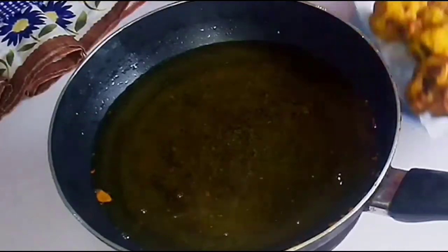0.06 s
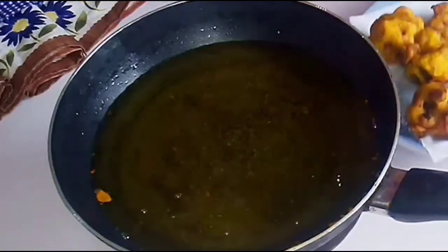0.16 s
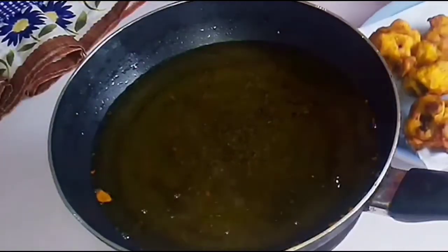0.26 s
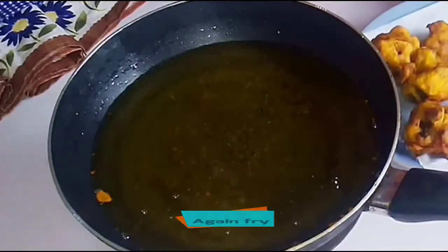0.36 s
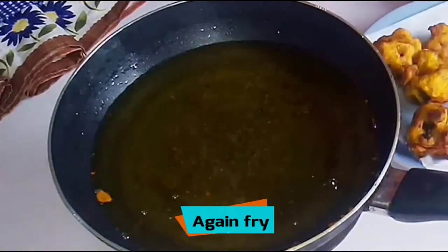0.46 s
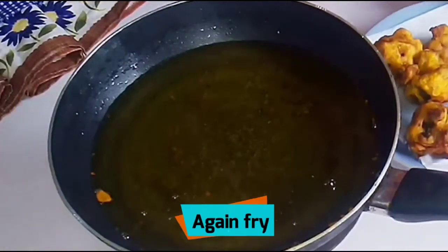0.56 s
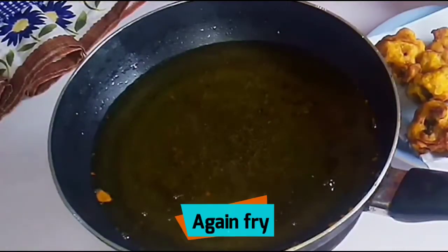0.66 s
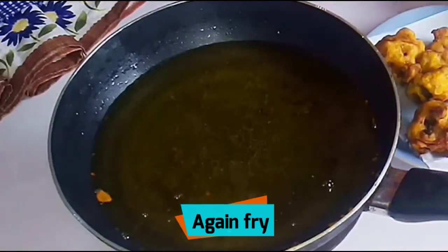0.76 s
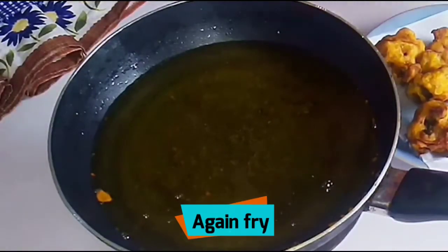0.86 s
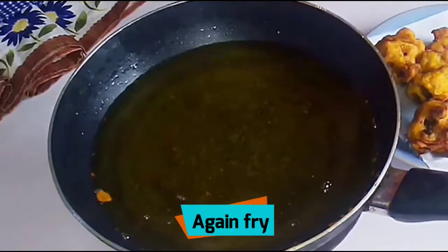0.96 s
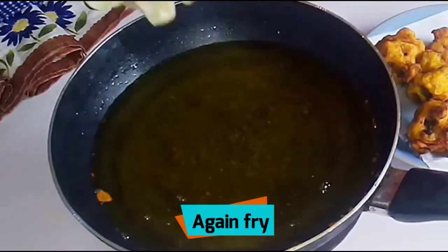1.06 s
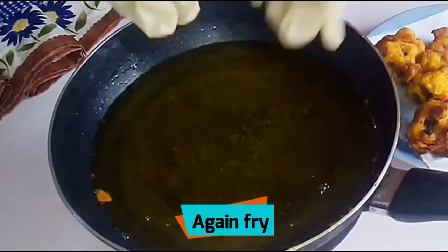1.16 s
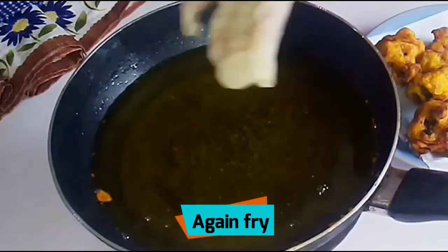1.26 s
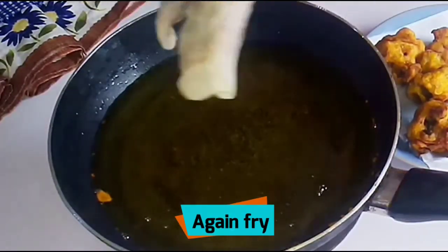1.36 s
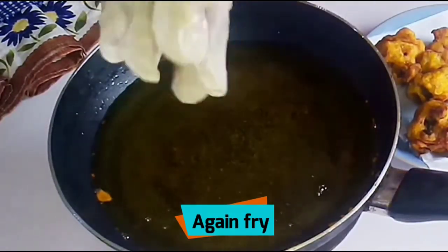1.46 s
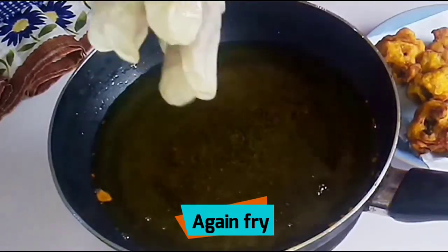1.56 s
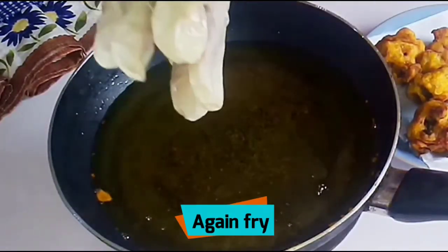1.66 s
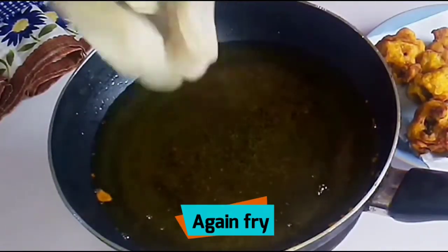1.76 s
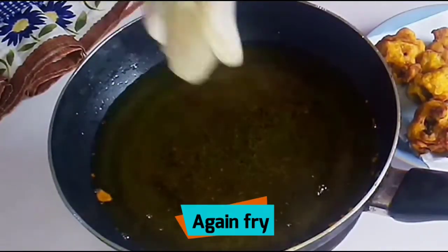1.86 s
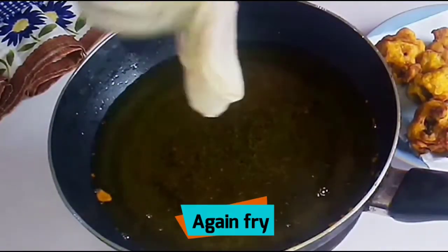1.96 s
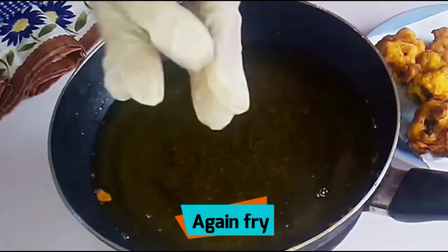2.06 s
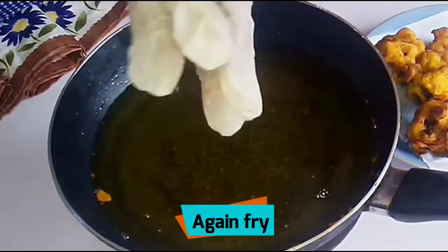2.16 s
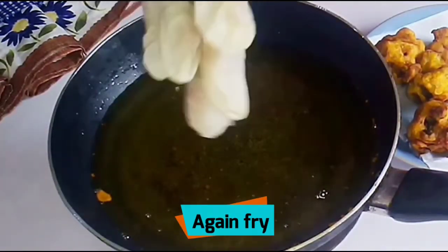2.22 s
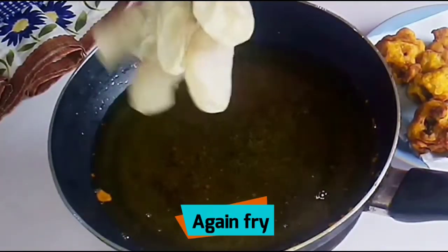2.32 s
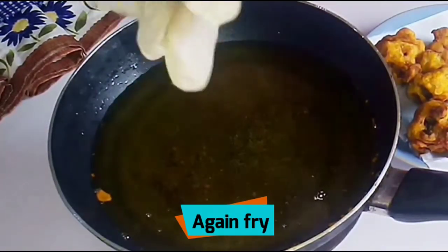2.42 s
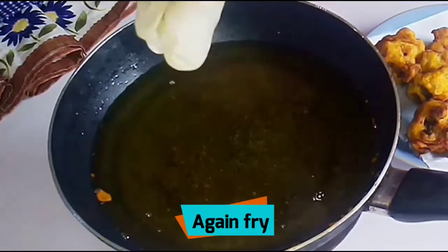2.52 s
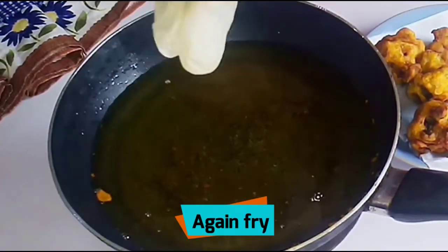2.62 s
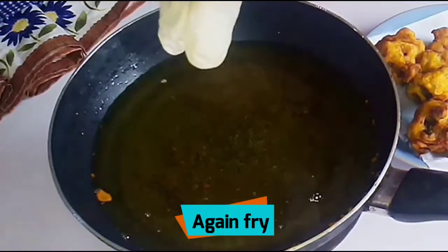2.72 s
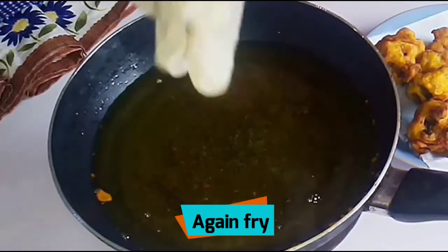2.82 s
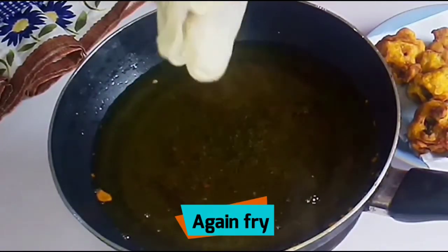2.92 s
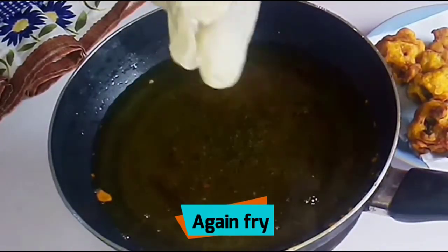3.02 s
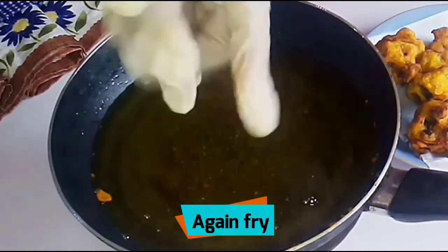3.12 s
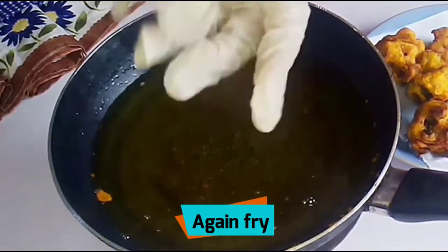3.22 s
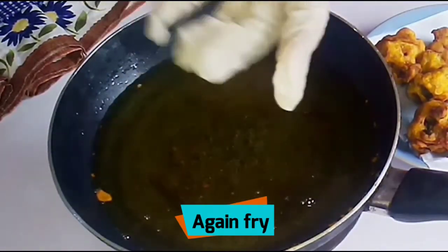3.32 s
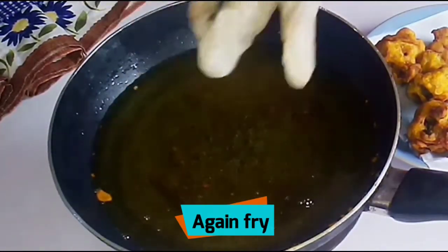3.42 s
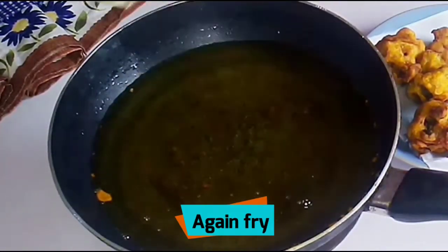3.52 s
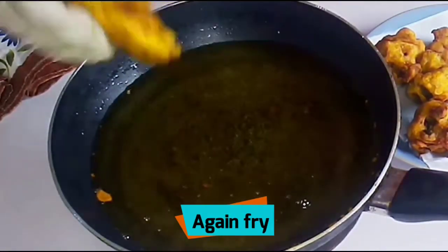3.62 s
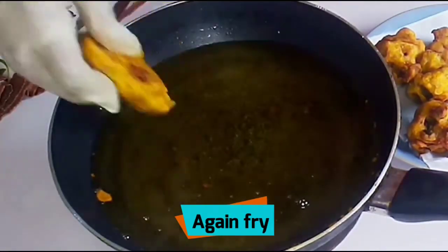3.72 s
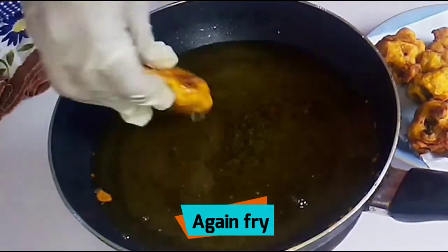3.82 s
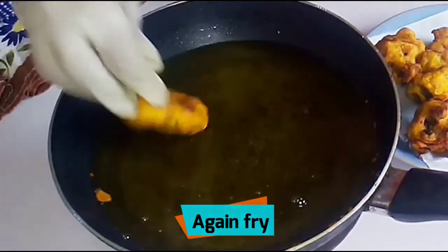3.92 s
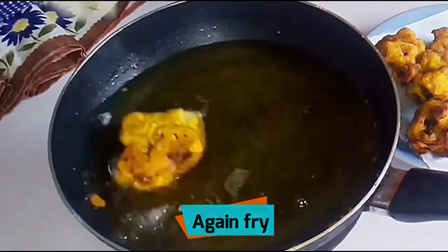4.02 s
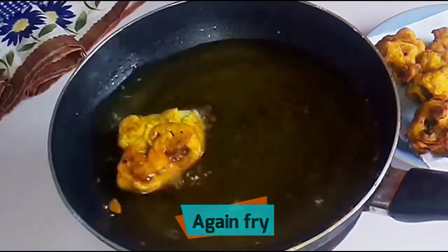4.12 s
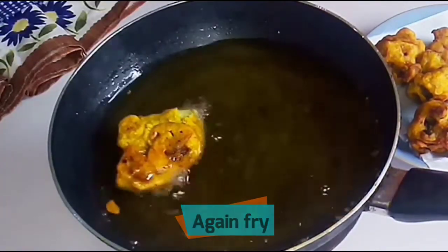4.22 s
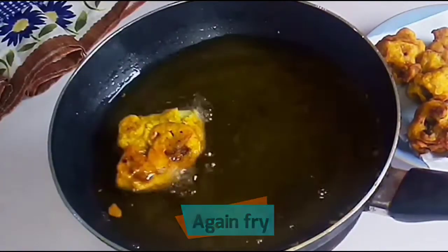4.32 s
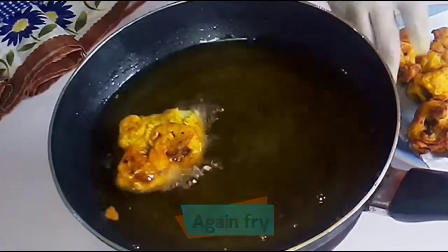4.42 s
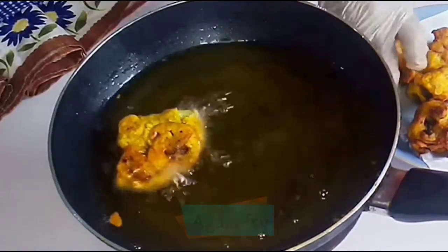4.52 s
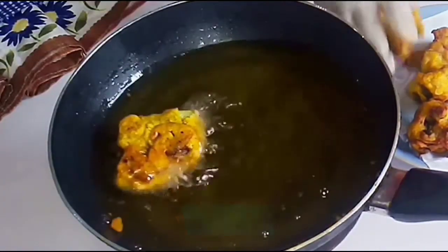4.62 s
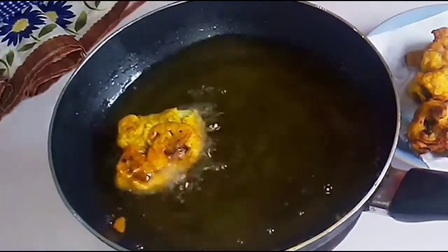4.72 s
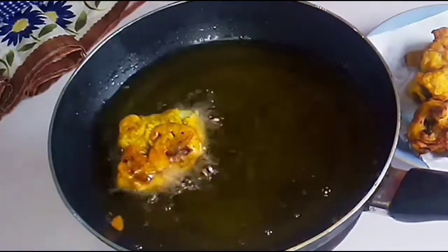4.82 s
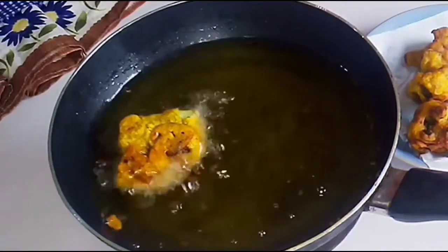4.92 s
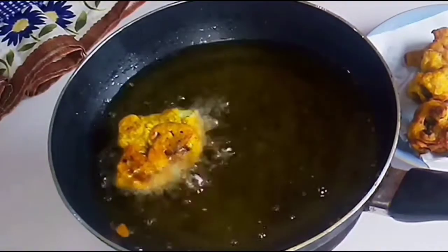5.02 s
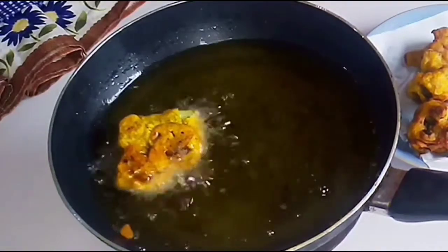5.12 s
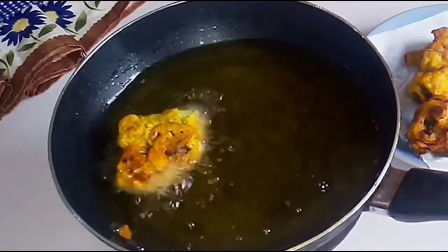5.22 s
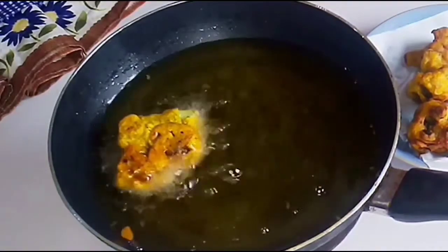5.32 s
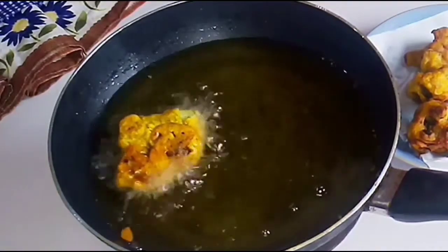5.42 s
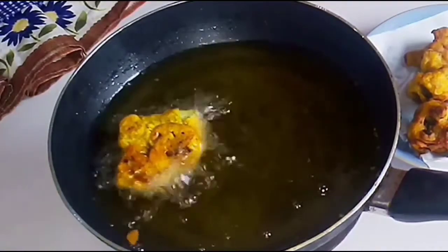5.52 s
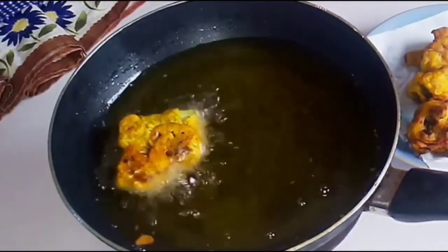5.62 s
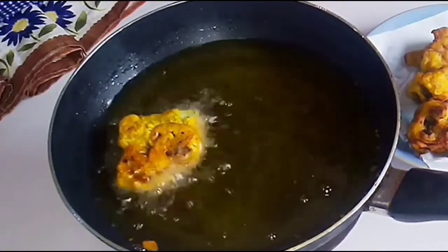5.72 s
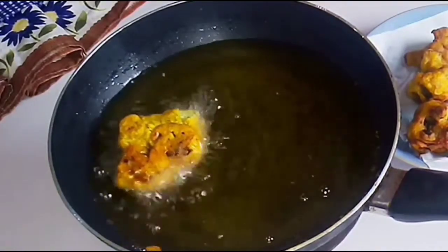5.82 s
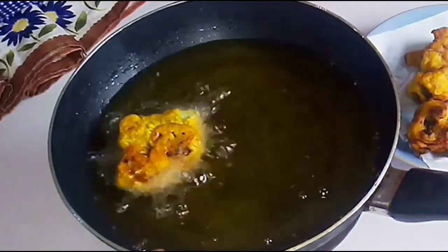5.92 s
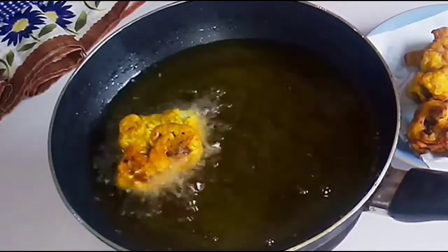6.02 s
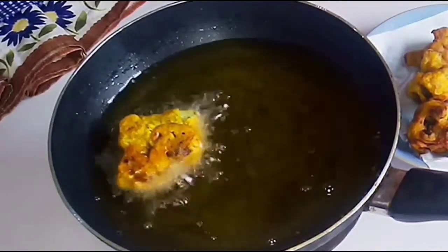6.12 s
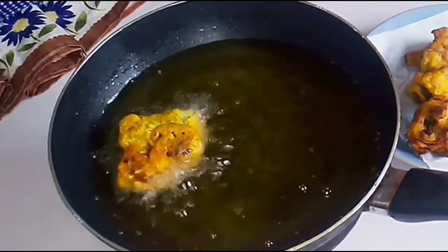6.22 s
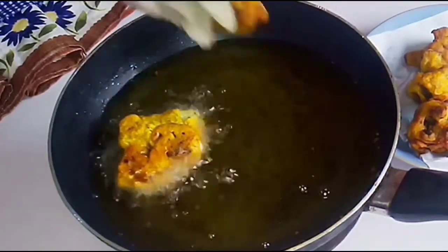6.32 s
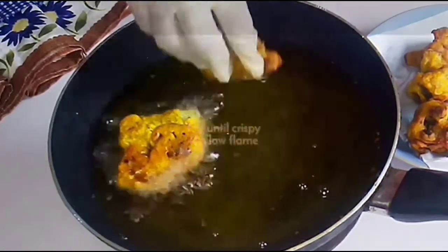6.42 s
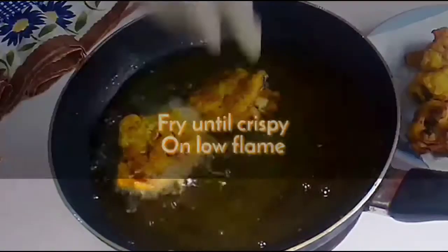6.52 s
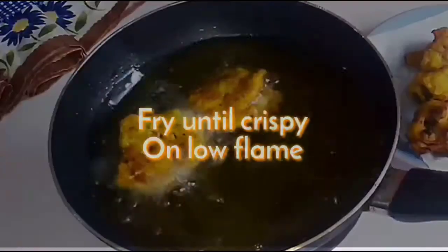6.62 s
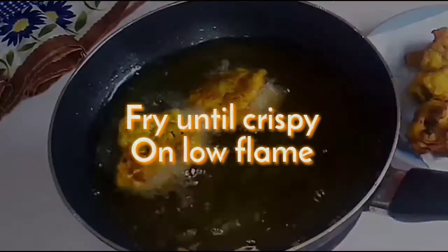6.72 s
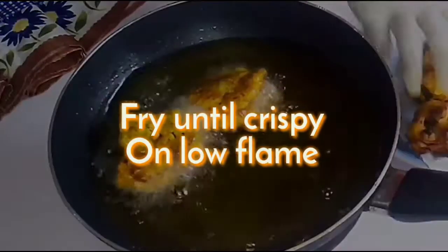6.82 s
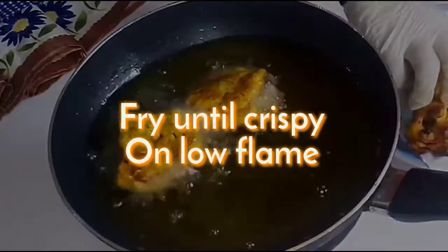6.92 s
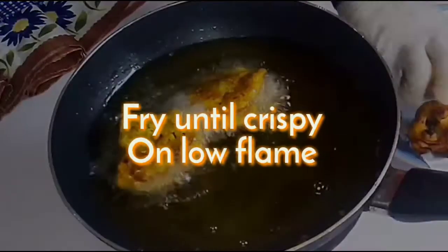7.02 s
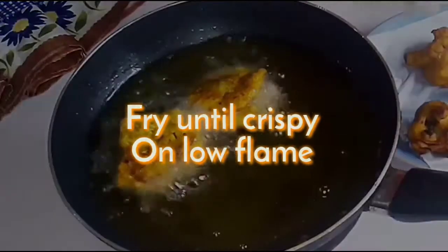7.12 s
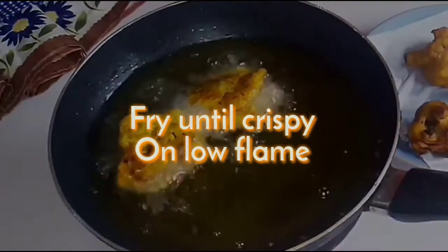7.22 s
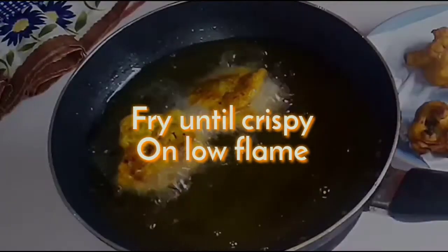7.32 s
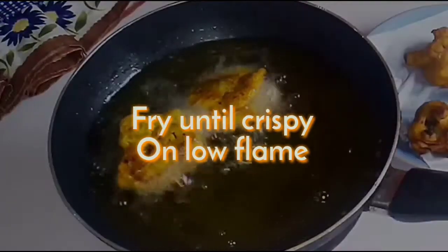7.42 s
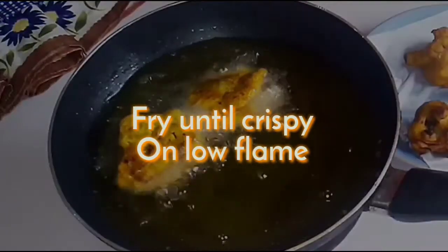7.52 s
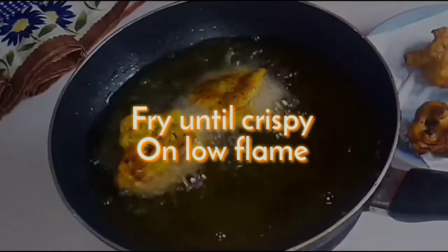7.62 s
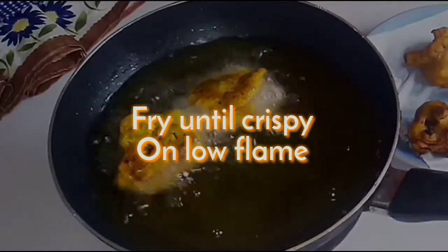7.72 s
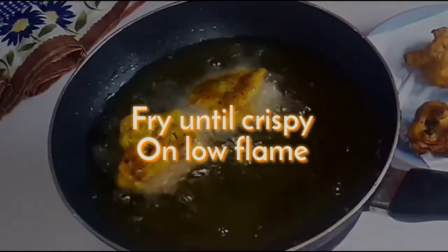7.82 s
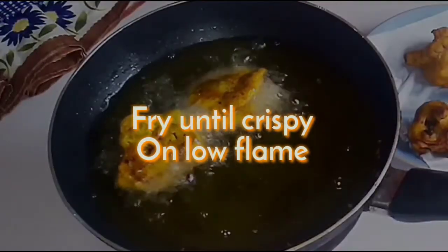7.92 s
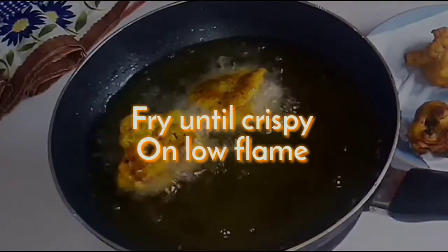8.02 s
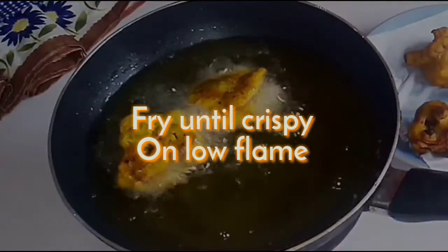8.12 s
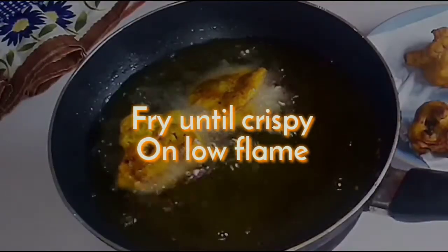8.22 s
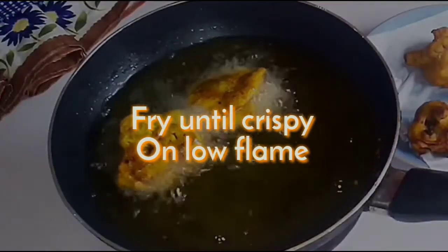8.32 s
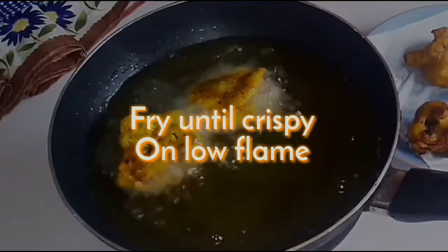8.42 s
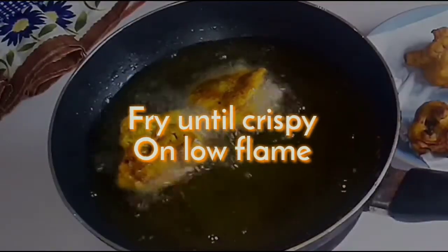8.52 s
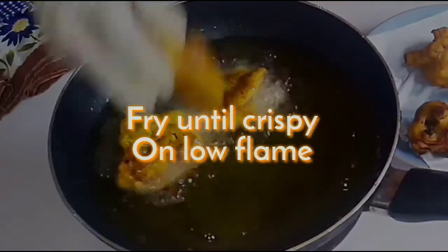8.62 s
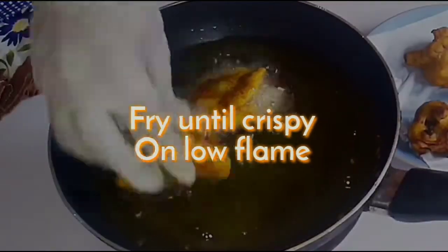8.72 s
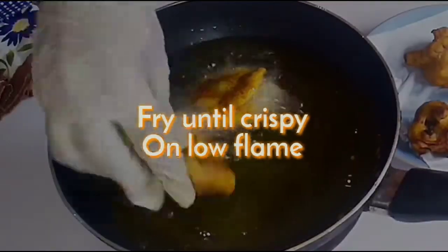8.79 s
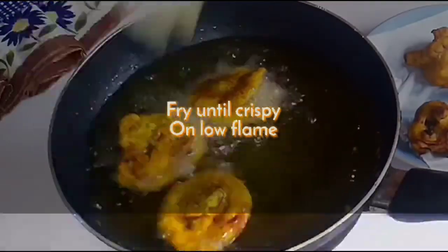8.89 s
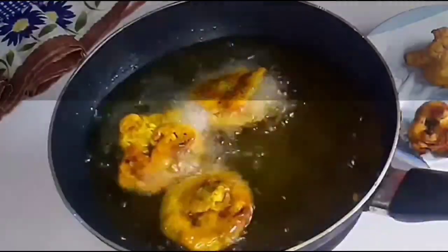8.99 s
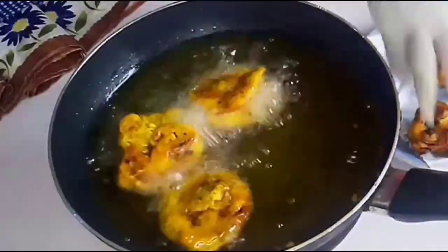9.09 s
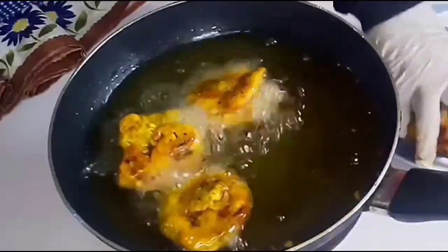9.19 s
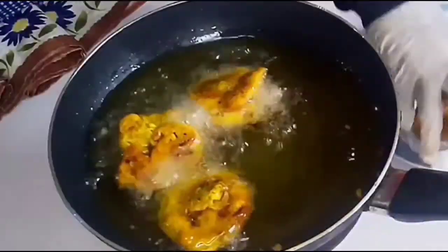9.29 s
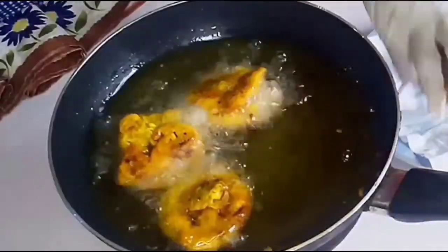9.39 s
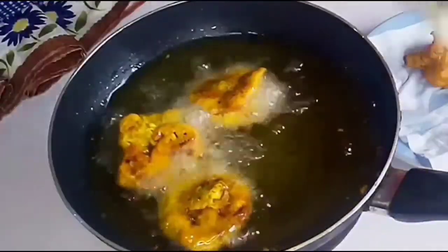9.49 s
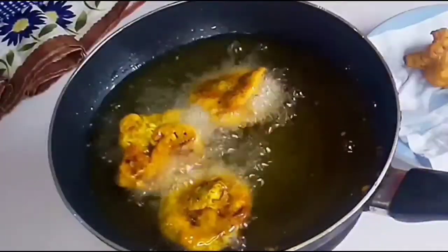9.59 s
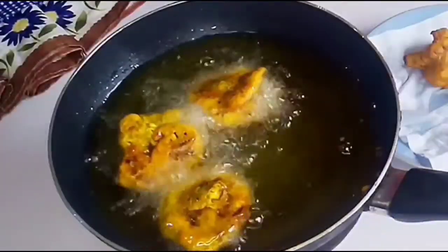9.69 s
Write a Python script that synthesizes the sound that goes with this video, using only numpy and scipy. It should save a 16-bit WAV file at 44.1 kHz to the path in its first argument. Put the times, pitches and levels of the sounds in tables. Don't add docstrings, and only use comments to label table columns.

```python
import sys
import numpy as np
from scipy import signal
from scipy.fft import rfft, irfft
from scipy.io import wavfile
from scipy.ndimage import uniform_filter1d

SR = 44100
rng = np.random.default_rng(int(sys.argv[2]) if len(sys.argv) > 2 else 0)


def boost(x):
    u = np.asarray(x, float) / 20
    return 10 ** u


def file_out(sig):
    cols = np.atleast_2d(sig).T
    lim = np.clip(cols, -1, 1)
    pcm = np.round(lim * 32767).astype(np.int16)
    wavfile.write(sys.argv[1], SR, pcm)


N = 429975

# frequency [Hz], level [dB per Hz].
SIZZLE_COLOUR = [(12, -37.5), (20, -17.5), (33, -17), (276, -21), (586, -16), (775, -17), (916, -12),
                 (1320, -15), (1470, -9.5), (1840, -14), (2120, -9), (3600, -2), (4370, -1.5),
                 (14100, -7.8), (15800, -16.5)]
# frequency [Hz], share heard alike in both [0-1], left minus right [dB].
MIC_PORTS = [(60, 0.2, -2.5), (300, 0.42, -4), (700, 0.56, -2.5), (1400, 0.6, -3), (2500, 0.2, -1.5),
             (4000, 0.42, -1.5), (7000, 0.32, -1), (13700, 0.03, 0)]
# time [s], level [dB].
FRYING_VIGOUR = [(6.1, -25), (6.5, -25), (8.55, -25.5), (9.39, -27), (9.42, -24.5), (9.53, -29),
                 (9.57, -25), (9.6, -26.5), (9.75, -26)]
# start [s], peak [dB], pitch [Hz].
LOUD_POPS = [(5.246, -18.5, 3430), (5.5114, -17, 5200), (6.2162, -14.5, 3900), (6.2973, -15, 3600),
             (6.355, -19, 5230), (6.4097, -25, 3700), (6.7182, -17, 3680), (6.799, -10.5, 4100),
             (6.8514, -18, 3690), (6.914, -21.5, 3850), (7.093, -16, 5200), (7.241, -17, 5730),
             (7.3821, -20.5, 4800), (7.448, -12.5, 4120), (7.5318, -19, 4870), (7.6615, -15, 4350),
             (7.7378, -15, 4350), (7.8491, -13, 3650), (7.9853, -16, 4150), (8.127, -19, 3630),
             (8.1848, -16, 4430), (8.656, -14, 3670), (8.778, -13, 4240), (8.8388, -14, 3250),
             (8.9486, -14, 4450), (9.069, -11, 4100), (9.1706, -19, 4140), (9.2614, -19, 3550),
             (9.425, -16, 4000), (9.5569, -16.5, 3210)]
# start [s], peak [dB], pitch [Hz].
FADED_POPS = [
    (4.6432, -31, 3500),
    (4.7057, -28, 5280),
    (4.797, -26, 3230),
    (4.8489, -31, 3150),
    (4.951, -28, 4350),
    (5.0294, -20, 4800),
]

# start [s], pace [ratio], level [dB].
PHRASE_TIMES = [
    (.1, 1.0, -.5),
    (.895, 1.05, .5),
]
# time after the start [s], length [s], from [Hz], to [Hz], level [dB].
PHRASE_GLIDES = [
    (0, 0.035, 1840, 3900, -59.5),
    (.005, .016, 3730, 5370, -66),
    (.1, 0.031, 2000, 3750, -57.5),
    (.175, 0.029, 3600, 3480, -62),
    (.25, 0.013, 5030, 7000, -71),
    (.25, .025, 4780, 4900, -65),
]
# time after the start [s], length [s], top pitch [Hz], level [dB].
PHRASE_HOOKED = [
    (.033, .025, 3790, -57),
    (.13, .019, 3680, -47.5),
    (.273, .035, 4200, -57.5),
]
# both starts [s], then slides of time after the start [s],
# length [s], from [Hz], to [Hz], level [dB].
TWICE_CALLS = [
    ((2.745, 3.345), [(0, .09, 4230, 5600, -56.5)]),
    ((3.583, 3.698), [(0, .018, 6000, 7600, -69)]),
    ((3.765, 3.916), [(0, 0.0267, 1745, 2640, -69), (.016, 0.0163, 2590, 3170, -53)]),
]
# start [s], length [s], from [Hz], to [Hz], level [dB].
SINGLE_SLIDES = [(.343, 0.013, 2010, 4800, -60), (.46, .051, 3500, 2590, -59),
                 (.695, 0.044, 3300, 2460, -52.5), (.745, 0.019, 2200, 1740, -68),
                 (1.125, 0.074, 3300, 2590, -53), (1.24, .03, 5100, 6270, -72),
                 (1.36, 0.098, 3100, 2610, -56.5), (1.465, 0.037, 4130, 4620, -68),
                 (1.705, 0.016, 2500, 3800, -61), (1.99, 0.1, 3200, 2500, -61.5),
                 (2.223, 0.019, 3200, 5100, -54.5), (2.945, .037, 3900, 3000, -75),
                 (3.065, 0.058, 2750, 2320, -66), (3.12, 0.068, 2290, 2000, -69),
                 (3.28, 0.064, 2400, 2020, -64.5), (3.3, .025, 4400, 5560, -74),
                 (3.713, 0.011, 6040, 4200, -66), (3.863, .011, 7700, 4770, -69),
                 (3.92, .04, 4180, 4730, -71), (3.94, 0.027, 5600, 3600, -71)]
# start [s], length [s], pitch [Hz], level [dB].
HELD_NOTES = [(0, 0.06, 3230, -66), (.53, 0.059, 2780, -57), (1.21, 0.13, 2910, -56),
              (2.07, 0.095, 2804, -55), (2.225, .054, 3020, -56), (2.28, 0.082, 2510, -56),
              (2.54, 0.18, 2900, -57), (3.105, 0.14, 2820, -55), (3.105, 0.046, 4520, -69),
              (3.1, 0.065, 6020, -87), (3.25, .042, 4370, -68), (3.33, .05, 3050, -61),
              (3.625, 0.03, 4070, -71), (3.703, 0.017, 6750, -71)]
# start [s], length [s], from [Hz], to [Hz], level [dB].
HIGH_BIRD_OPENING = [
    (1.47, .04, 5050, 6350, -71),
    (1.505, .063, 6540, 7020, -61),
    (1.525, 0.064, 8280, 8180, -72),
    (1.55, 0.02, 7200, 5200, -57),
    (1.705, 0.044, 4300, 8070, -58.5),
    (1.72, .11, 5450, 5650, -57),
    (1.74, 0.082, 7570, 7700, -70),
]
HIGH_BIRD_STARTS = (1.895, 2.13, 2.385)
# time after the start [s], length [s], from [Hz], to [Hz], level [dB].
HIGH_BIRD_FIGURE = [
    (0, .1, 6840, 6000, -58),
    (.005, 0.076, 4710, 5200, -60),
    (.065, .13, 5220, 5250, -59),
]
# start [s], length [s], from [Hz], to [Hz], level [dB].
WARBLER_SLIDES = [
    (3.0, .095, 1700, 1520, -86),
    (3.105, .052, 1540, 1400, -76),
    (3.162, .065, 1510, 1480, -81),
]
# start [s], length [s], top pitch [Hz], level [dB].
WARBLER_ARCHES = [
    (3.237, .062, 1630, -78),
    (3.318, .06, 1690, -78),
]
HOOK_SHAPE = (.93, .7)
ARCH_SHAPE = (.83, .83)
# frequency [Hz], level [dB per Hz].
AIR_COLOUR = [(20, -25), (60, -18), (130, -35), (300, -14), (700, -12.5), (1400, -8.5), (2800, 13.5),
              (5000, -5.5), (7000, -22), (10000, -15.5), (15500, -22.5)]

CHANGE_S = 2.576
FRY_S, FRY_N = 4.1045, N - round(4.1 * SR)
FADE_START_S, FADE_END_S = 4.075, 6.05
FIRST_STEP_S, FADE_FROM_DB = .09, -29
PAN_HZ, PAN_WIDTH_HZ = 1499, 27
LOW_DB, LOW_FOLLOWS, LOW_SWING_DB, LOW_SAG_DB_PER_S = -.4, .3, 1.6, .75
WALL_SHARE = .54
SLIDE_BOW = .1
TRILL_S, TRILL_EVERY_S, DROP_AFTER_S, TRILL_NOTE_S = 2.283, .107, .034, .022
TRILL_DB, TRILL_LOSS_DB, DROP_DB = -56.5, 2.0, -59
FLICK_FROM_HZ, FLICK_TO_HZ, FLICK_STEP_HZ = 4000, 5550, 270
DROP_FROM_HZ, DROP_TO_HZ = 4400, 3400
AIR_DB = -71
TOP_HZ, FLUTTER_HZ = 15470, 15150


def frying():
    t = np.arange(N - FRY_N, N) / SR
    vigour_db = np.interp(t, *np.transpose(FRYING_VIGOUR))
    low_db = LOW_DB + (LOW_FOLLOWS - 1) * (vigour_db - vigour_db.mean())
    low_db = low_db + LOW_SWING_DB * drift(11.0, size=FRY_N) - LOW_SAG_DB_PER_S * np.maximum(t - 6.5, 0)
    surge = boost(1.4 * drift(18, size=FRY_N))
    both, left, right = [boil(surge, low_db, wash) for wash in (0, WALL_SHARE, WALL_SHARE)]
    hum = rms_one(ring(both, PAN_HZ, np.log(1000) / np.pi / PAN_WIDTH_HZ))
    late = np.exp(-2j * np.pi * 2.58 * np.arange(FRY_N // 2 + 1) / FRY_N)
    ports = []
    for ear, own in ((1, left), (-1.2, right)):
        tone = lambda hz: at_hz(SIZZLE_COLOUR, hz) + ear * at_hz(MIC_PORTS, hz, axis=2) / 2
        share = lambda hz: np.clip(at_hz(MIC_PORTS, hz), .01, .99)
        shared = colour(both, lambda hz: boost(tone(hz)) * np.sqrt(share(hz)))
        shared = shared + boost(-37.5 + ear * -1.2) * hum
        if ear == 1:
            shared = irfft(rfft(shared) * late, FRY_N)
        ports.append(shared + colour(own, lambda hz: boost(tone(hz)) * np.sqrt(1 - share(hz))))
    sizzle = fade_up(t) * boost(vigour_db + 3.5) * rms_one(np.array(ports))
    return np.pad(sizzle, ((0, 0), (N - FRY_N, 0)))


def boil(surge, low_db, wash):
    bursts = rms_one(grains(14000 * surge, spread_db=2.5, most=4))
    thumps = rms_one(grains(900 * surge, spread_db=3.0, most=7.9)) + .64 * bursts
    low = signal.butter(2, 1200, fs=SR, output="sos")
    high = signal.butter(2, 1200, "high", fs=SR, output="sos")
    births = grains(5000 * surge, spread_db=3.5, most=4)
    dealt = rng.integers(0, 22, FRY_N)
    pitches = np.geomspace(1500, 15000, 22)
    heave_db = 2.74 * drift(4.1, size=FRY_N)
    bubbles = 0
    for k, hz in enumerate(pitches):
        clumps = boost(3.1 * drift(9.1, size=FRY_N) + heave_db * pitches[0] / hz)
        bubbles = bubbles + np.sqrt(hz) * clumps * rms_one(ring(births * (dealt == k), hz, 15.0 / hz))
    walls = wash * rng.standard_normal(FRY_N)
    crackle = .72 * bursts + .7 * rms_one(bubbles) + .23 * gurgle(surge) + walls
    top = signal.sosfilt(high, crackle)
    bottom = boost(low_db) * signal.sosfilt(low, rms_one(thumps) + walls)
    return (top + bottom) / np.hypot(1, wash)


def gurgle(surge):
    births = grains(260 * surge, spread_db=4.0, most=4)
    dealt = rng.integers(0, 24, FRY_N)
    pitches = np.geomspace(2400, 6500, 24)
    return rms_one(sum(ring(births * (dealt == k), hz, 67.0 / hz) for k, hz in enumerate(pitches)))


def grains(per_s, spread_db, most):
    size_db = spread_db * np.minimum(rng.exponential(1, FRY_N), most)
    size = boost(size_db) * rng.choice([-1, 1], FRY_N)
    return size * (rng.random(FRY_N) < per_s / SR)


def ring(clicks, hz, t60):
    r, w = boost(-60 / (t60 * SR)), 2 * np.pi * hz / SR
    return signal.lfilter([0, np.sin(w)], [1, -2 * r * np.cos(w), r * r], clicks + 1e-18)


def fade_up(t):
    rise = np.interp(t, [FADE_START_S, FADE_END_S], [0, 1])
    return np.where(t < FRY_S + FIRST_STEP_S, boost(FADE_FROM_DB), rise) * (t >= FRY_S)


def pops():
    out, t = np.zeros((2, N + 2000)), np.arange(2000) / SR
    events = FADED_POPS + LOUD_POPS
    chance = rng.normal(0, 1, (len(events), 2))
    for (s, db, hz), side in zip(events, chance):
        i = round(s * SR)
        pop = np.sin(2 * np.pi * hz * t * (1 + 4.0 * t)) * boost(-60 * t / .03)
        out[:, i:i + len(t)] += boost(db - 6.5 + 2.8 * side)[:, None] * pop
    return np.array([ear[:N] + 1.5 * echoes(ear[:N], t60=.11) for ear in out])


def echoes(x, t60):
    t = np.arange(round(t60 * SR)) / SR
    tail = rng.standard_normal(len(t)) * boost(-60 * t / t60)
    return signal.oaconvolve(x, tail / np.sqrt(np.sum(tail ** 2)))[:N]


def garden():
    return boost(3.0) * (lower_birds() + higher_bird() + .8 * warbler()) + still_air()


def lower_birds():
    notes = song() + slides(WARBLER_SLIDES, db=2.5)
    return trees(whistle(notes), t60=.96, direct_db=-5.0, left_db=3.5)


def higher_bird():
    notes = slides(HIGH_BIRD_OPENING) + slides(HIGH_BIRD_FIGURE, HIGH_BIRD_STARTS)
    heard = np.clip((CHANGE_S - np.arange(N) / SR) / .004, 0, 1)
    return trees(whistle(notes), t60=.96, direct_db=-8.0, left_db=4.0) * heard


def warbler():
    return whistle(slides(WARBLER_SLIDES) + bends(WARBLER_ARCHES, ARCH_SHAPE), rough=.3)


def song():
    beats = TRILL_S + TRILL_EVERY_S * np.arange(4)
    flicks = [(s, TRILL_NOTE_S, FLICK_FROM_HZ, FLICK_TO_HZ - k * FLICK_STEP_HZ, TRILL_DB - k * TRILL_LOSS_DB)
              for k, s in enumerate(beats)]
    drop = (DROP_AFTER_S, TRILL_NOTE_S, DROP_FROM_HZ, DROP_TO_HZ, DROP_DB)
    notes = slides(SINGLE_SLIDES + flicks) + slides([drop], beats) + bends(HELD_NOTES, (1, 1))
    for s, pace, db in PHRASE_TIMES:
        notes += slides(PHRASE_GLIDES, [s], pace, db) + bends(PHRASE_HOOKED, HOOK_SHAPE, s, pace, db)
    for starts, rows in TWICE_CALLS:
        notes += slides(rows, starts)
    return notes


def slides(rows, starts=(0,), pace=1, db=0):
    return [(start + pace * s, length, a, (a + b) / 2 + SLIDE_BOW * abs(b - a), b, level + db)
            for start in starts for s, length, a, b, level in rows]


def bends(rows, shape, start=0, pace=1, db=0):
    return [(start + pace * s, length, shape[0] * hz, hz, shape[1] * hz, level + db)
            for s, length, hz, level in rows]


def whistle(notes, rough=1):
    out, waver = np.zeros(N), 1 + .0092 * drift(140)
    rasp_band = signal.butter(4, 300, fs=SR, output="sos")
    hoarse = .6 * rms_one(signal.sosfilt(rasp_band, rng.standard_normal(N)))
    for s, length, start_hz, middle_hz, end_hz, db in notes:
        i, n = max(round(s * SR), 0), round(length * SR)
        x = np.arange(n) / n
        curve = np.polyfit([0, .5, 1], [start_hz, middle_hz, end_hz], deg=2)
        turn = 2 * np.pi * np.cumsum(np.polyval(curve, x) * waver[i:i + n]) / SR
        rasp = 1 + rough * hoarse[i:i + n] * min(.045 / length, 1)
        swell = np.sin(np.pi * x) ** .25
        out[i:i + n] += boost(db) * rasp * swell * (np.sin(turn) + boost(-36.5) * np.sin(2 * turn))
    return signal.sosfilt(signal.butter(4, 1250, "high", fs=SR, output="sos"), out)


def trees(x, t60, direct_db, left_db):
    t = np.arange(SR * 2) / SR
    decay = boost(2.5 - 60 * t / .12) + boost(-60 * t / t60) + boost(-8.5 - 60 * t / (2.3 * t60))
    tail = rng.standard_normal((2, len(t))) * decay
    tail = tail / np.sqrt(np.sum(tail ** 2, axis=1, keepdims=True))
    tail[:, 0] = boost(direct_db)
    return signal.oaconvolve(x[None], tail)[:, :N] * boost(np.array([[left_db], [-left_db]]) / 2)


def still_air():
    air = [colour(rng.standard_normal(N), lambda hz: boost(at_hz(AIR_COLOUR, hz))) for ear in range(2)]
    return rms_one(np.array(air)) * boost(AIR_DB + np.where(np.arange(N) / SR < CHANGE_S, 3.0, .1))


def rms_one(x):
    return x / np.sqrt(np.mean(x ** 2) + 1e-20)


def at_hz(points, hz, axis=1):
    points = np.array(points)
    return np.interp(np.log(hz), np.log(points[:, 0]), points[:, axis])


def colour(x, gain):
    hz = np.maximum(np.arange(2049) * SR / 4096, 10)
    cep = irfft(np.log(gain(hz) + 1e-7))
    cep = np.r_[cep[0], 2 * cep[1:2048], np.zeros(2048)]
    return signal.oaconvolve(x, irfft(np.exp(rfft(cep))))[:len(x)]


def drift(rate, size=N):
    r = np.exp(-80 * np.pi * rate / SR)
    slow = signal.lfilter([1], [1, -2 * r, r * r], rng.standard_normal(size // 40 + 2002))[2000:]
    return np.interp(np.arange(size) / 40, np.arange(len(slow)), rms_one(slow - slow.mean()))


def scene():
    return frying() + pops() + garden()


def band_limit(x):
    return signal.sosfilt(signal.butter(12, 16010, fs=SR, output="sos"), x)


def record(dry):
    rounded = .38 * np.tanh(dry / .38)
    narrow, wide = [signal.sosfiltfilt(signal.ellip(10, .2, 40, hz, fs=SR, output="sos"), rounded)
                    for hz in (FLUTTER_HZ, TOP_HZ)]
    top_on = uniform_filter1d(1.0 * (drift(14) > .2), size=900)
    offset = -.00006 - .0042 * fade_up(np.arange(N) / SR)
    return band_limit(narrow + top_on * (wide - narrow) + offset)


dry = scene()
out = record(dry)
file_out(out)
```